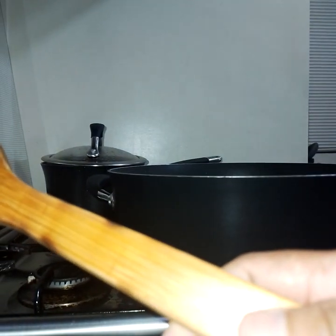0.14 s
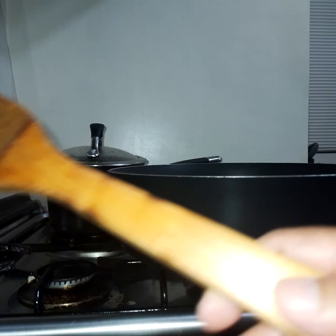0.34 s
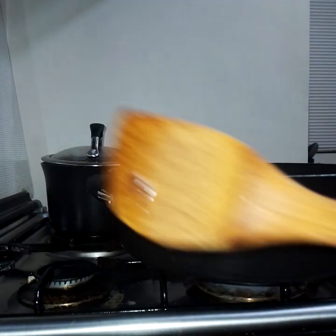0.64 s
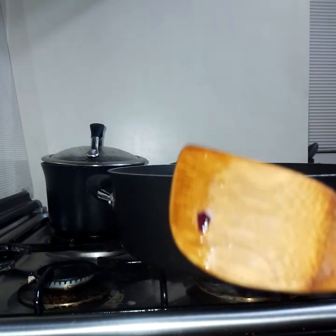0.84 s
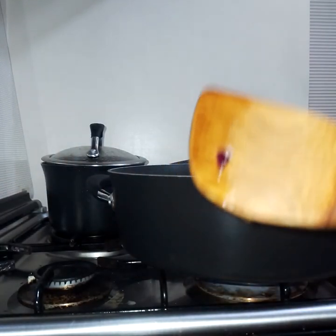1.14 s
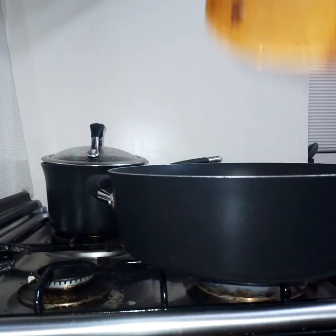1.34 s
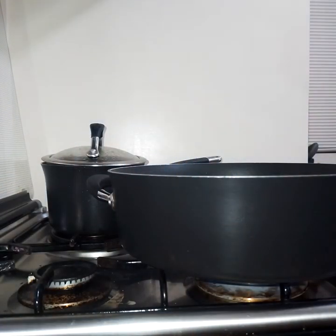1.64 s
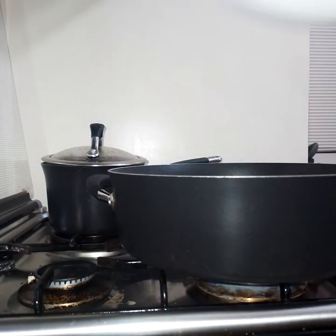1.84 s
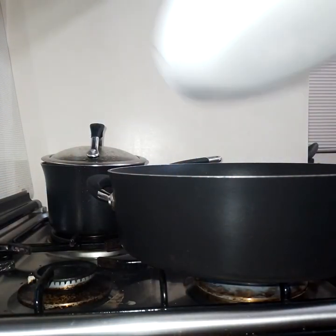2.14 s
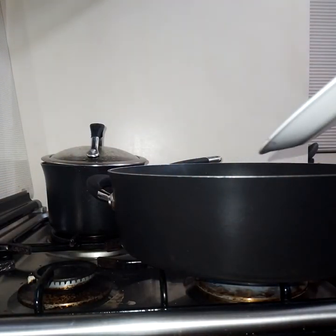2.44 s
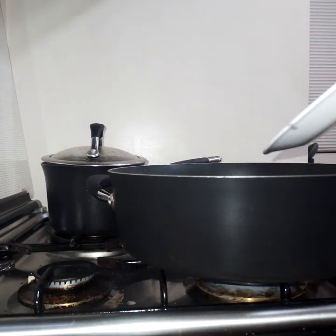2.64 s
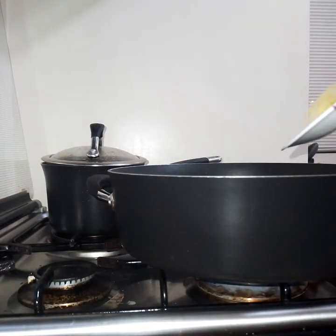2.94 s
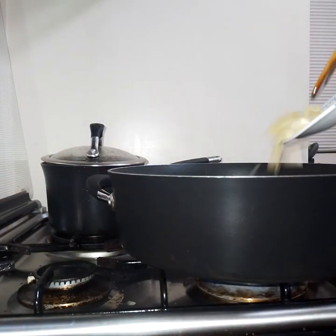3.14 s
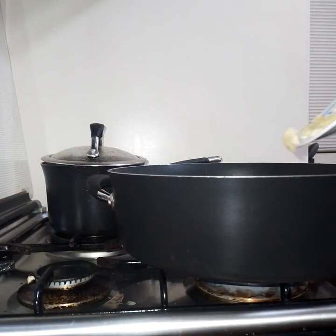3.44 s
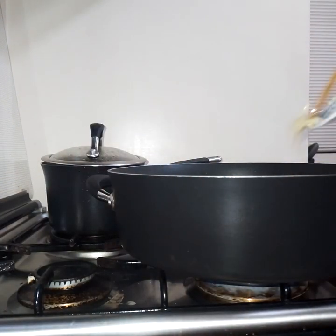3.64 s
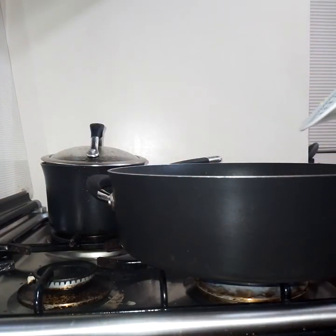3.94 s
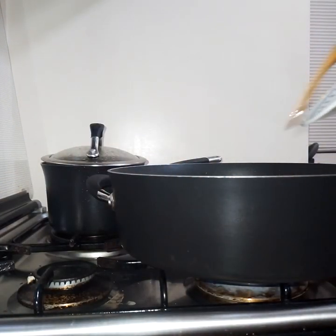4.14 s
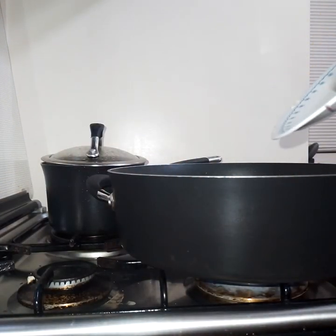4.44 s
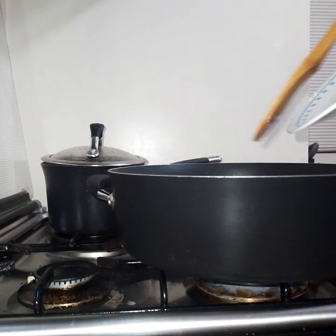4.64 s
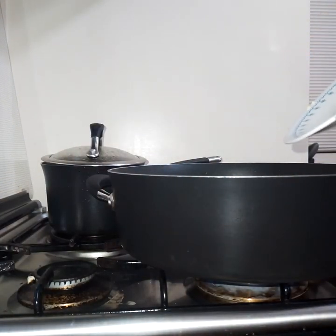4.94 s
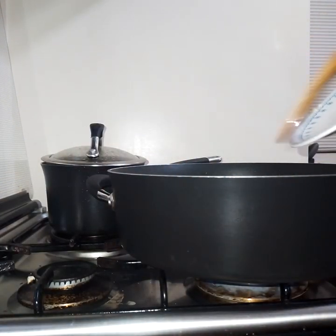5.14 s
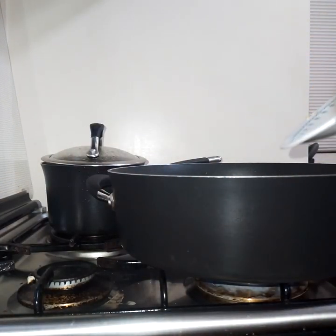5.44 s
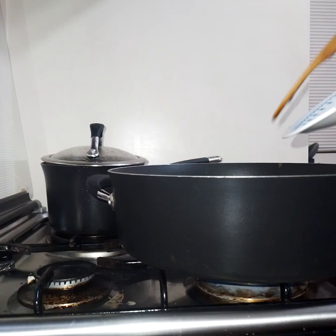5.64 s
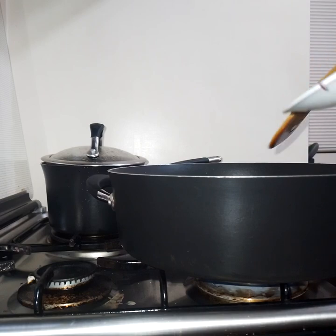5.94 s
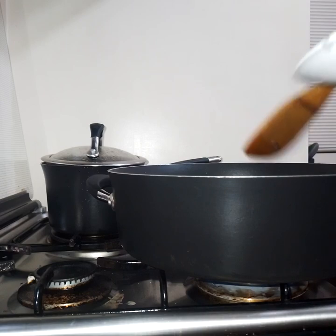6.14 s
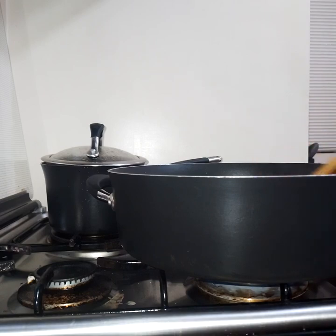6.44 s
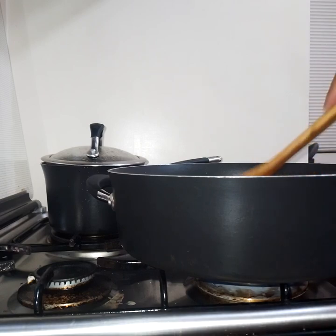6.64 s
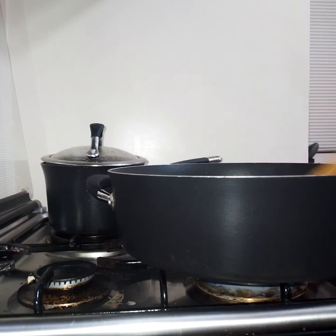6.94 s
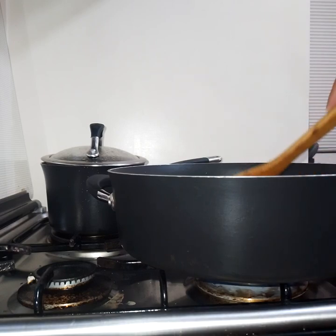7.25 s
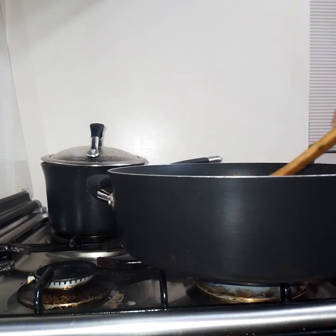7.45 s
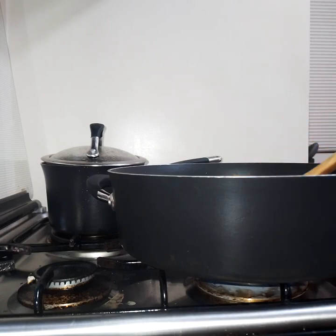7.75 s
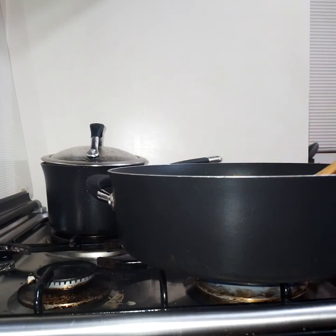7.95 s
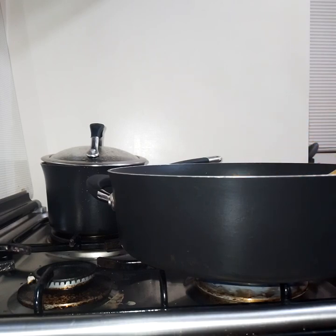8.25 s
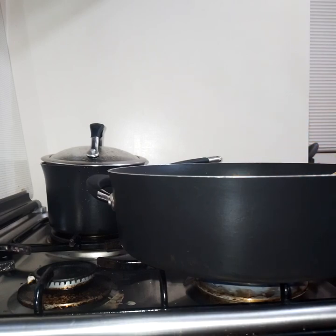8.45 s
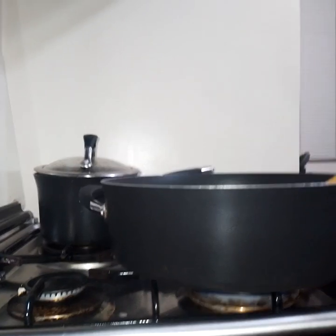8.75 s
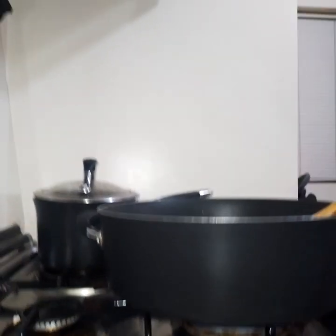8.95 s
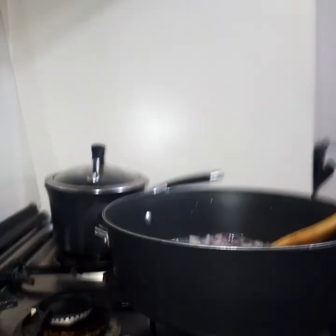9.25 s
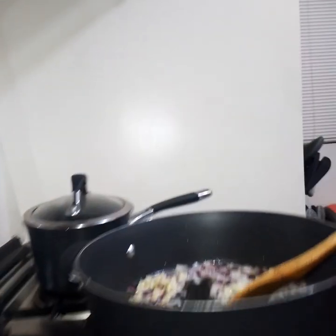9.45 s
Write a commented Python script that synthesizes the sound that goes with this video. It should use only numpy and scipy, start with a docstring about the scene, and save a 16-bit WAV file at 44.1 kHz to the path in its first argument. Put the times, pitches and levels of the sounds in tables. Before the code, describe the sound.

A bright, steady sizzle of onion and garlic in oil runs throughout, swelling gently around 1.9, 3.2 and 4.5 s, with small crackles and sharp spits scattered left and right, the strongest near 6.1 s. Beneath it a gas flame makes a quiet low roar and soft rush, stronger on the left. Faint plate taps come at 1.3 and 2.2 s. Around 3.1-3.2 s clumps of food land with dull thuds, another at 3.7. A wooden spatula clacks sharply on a hand-held plate at 3.9 and 4.4, then more lightly from 4.9 to 5.9, with brief groaning, squeaky scrapes after 4.4 and 5.8. At 6.85-7.1 it knocks the pan and judders in a rapid, fading, rising stutter. Only frying follows until about 9.1 s, when the flame's rush dims and a very loud double thump with a click strikes the left microphone. The small tiled kitchen adds a short reverberation.

```python
"""Onion and garlic sizzle and spit in oil over a gas flame in a small kitchen: shaped noise and puffs.
A wooden spatula taps and scrapes a plate (damped modes and noise) while clumps of onion drop in the pan.
Then it knocks and judders on the pan, ringing the metal's modes.
Near the end the camera is lifted, which screens the flame, and bumped right beside its left microphone port."""
import sys
import numpy as np
from scipy import signal
from scipy.fft import rfft, irfft, next_fast_len
from scipy.io import wavfile
from scipy.ndimage import map_coordinates

SR = 44100
rng = np.random.default_rng(int(sys.argv[2]) if len(sys.argv) > 2 else 0)


def int16_out(signal):
    """Quantize to a 16-bit WAV file."""
    q = np.round(np.clip(np.atleast_2d(signal).T, -1, 1) * 32767)
    wavfile.write(sys.argv[1], SR, q.astype(np.int16))


N = 422919
T = np.arange(SR * 3 // 4) / SR  # time axis of one short sound [s]

# modes of the plate left to ring: (frequency [Hz], level [dB], t60 [s])
PLATE_MODES = [(1160, -9, 0.18), (1238, -2.5, 0.22), (1301, -8, 0.28), (1560, -19, 0.061),
               (1969, -2.5, 0.18), (2180, -2.5, 0.22), (2285, -10, 0.078), (2700, -8.5, 0.086),
               (3570, -12.5, 0.11), (4230, -12.5, 0.14), (4910, -13, 0.09), (5660, -22, 0.027),
               (7150, -20, 0.3), (7570, -26, 0.15), (10400, -24, .2), (13400, -25, .15), (15300, -27, .12)]


def amp(db):
    """Decibels to gain."""
    return 10 ** (np.asarray(db) / 20)


def unit(x):
    """x at rms 1."""
    return x / np.sqrt(np.mean(x ** 2) + 1e-20)


def along(points, hz):
    """(Hz, value) points read on a log frequency axis."""
    f, v = np.transpose(points)
    return np.interp(np.log(hz + 1), np.log(f + 1), v)


def wobble(rate):
    """A smooth random curve, rate knots a second."""
    knots = rng.standard_normal(int(N * rate / SR) + 4)
    return map_coordinates(knots, [np.arange(N) * rate / SR])


def filtered(x, response):
    """x times a response of frequency."""
    n = x.shape[-1]
    padded = next_fast_len(n + SR // 2)
    spectrum = rfft(x, padded) * response(np.fft.rfftfreq(padded, 1 / SR))
    return irfft(spectrum, padded)[..., :n]


def coloured(x, spectrum):
    """x shaped by a spectrum, at rms 1."""
    return unit(filtered(x, lambda hz: amp(along(spectrum, hz))))


def resonance(hz, centre, width):
    """Causal response of one resonance, 1 at its centre."""
    return 1j * hz * width / (centre ** 2 - hz ** 2 + 1j * hz * width)


def panned(left_db):
    """Gains of the two channels for a left-right difference."""
    return amp([[left_db / 2], [-left_db / 2]])


def add(track, s, sound):
    """Mix a sound into the track at time s."""
    part = track[:, round(s * SR):][:, :sound.shape[-1]]
    part += sound[..., :part.shape[-1]]


def fade(t60):
    """Exponential decay that loses 60 dB in t60 seconds."""
    return np.exp(-np.log(1000) * T / t60)


def burst(t60):
    """Dying noise, unrelated in the two channels."""
    return rng.standard_normal((2, len(T))) * fade(t60)


def ring(modes):
    """Damped modes; the higher ones reach the two ports further out of step, up to 2 kHz."""
    out = np.zeros((2, len(T)))
    for hz, db, t60 in modes:
        start, skew = rng.uniform(-np.pi, np.pi, 2)
        phase = start + np.array([[0], [skew * min(hz / 2000, 1)]])
        out += amp(db) * fade(t60) * np.sin(2 * np.pi * hz * T + phase)
    return out


def in_kitchen(x, wet_db):
    """A close sound with its own diffuse tail from the tiled walls, made of decaying noise."""
    # reverberation of the room: (frequency [Hz], t60 [s])
    room_t60 = [(200, 0.58), (1000, 0.56), (3000, 0.57), (7000, 0.69), (15000, 0.48)]
    hz, t, bands = signal.stft(rng.standard_normal((2, len(T))), SR, nperseg=256)
    decay = np.exp(-np.log(1000) * t / along(room_t60, hz)[:, None])
    tail = signal.istft(bands * decay, SR, nperseg=256)[1]
    tail = tail / np.linalg.norm(tail[0])
    return x + amp(wet_db) * signal.fftconvolve(x, tail, axes=1)[:, :len(T)]


def lifted(start_s=9.05, length_s=0.15):
    """How far the camera has risen over the pan's rim, from 0 to 1."""
    return np.clip((np.arange(N) / SR - start_s) / length_s, 0, 1)


def sizzle(ticks_per_s=900, spread_db=2.0, tick_db=-8.0, rise_s=0.24, fall_s=0.29):
    """Countless tiny steam bursts merge into a flaring hiss; the larger ones stand out as ticks."""
    # moisture reaching the oil makes the frying flare up: (strongest time [s], gain [dB])
    flares = [(1.9, 2.5), (3.2, 1.3), (4.55, 3), (6.1, 0.7), (7.05, 0.7)]
    # spectrum of the frying: (frequency [Hz], density [dB per Hz])
    frying_spectrum = [(500, -35), (2000, 0), (3800, -2), (6000, -2.5), (9000, -0.5), (12500, -1.5),
                       (15500, 2)]
    steady_db, nearer_oil_db = -58, 0.7  # steady frying, and its gain once the camera is lifted

    t = np.arange(N) / SR
    hiss_db = steady_db + nearer_oil_db * lifted()
    for s, gain_db in flares:
        hiss_db += gain_db * np.exp(-((t - s) / np.where(t < s, rise_s, fall_s)) ** 2)
    hiss_db += 0.28 * wobble(4.5) + 0.71 * wobble(45)

    bursts = rng.random(N) < ticks_per_s / SR
    sizes = amp(spread_db * np.minimum(rng.exponential(size=N), 3))
    ticks = coloured(bursts * sizes * rng.standard_normal((2, N)), frying_spectrum)
    hiss = coloured(rng.standard_normal((2, N)), frying_spectrum)
    return amp(hiss_db) * (hiss + amp(tick_db) * ticks)


def spits(level_db=-1, wet_db=-8, scatter_db=3, sideways_db=6, scatter_octaves=0.46):
    """Water drops burst in the hot oil, each a short bright puff: a few large ones among many small."""
    # largest drops: (time [s], relative peak [dB], left-right difference [dB], resonance [Hz])
    large = [(.2035, -42, 16, 6900), (1.3897, -39.5, 12, 11400), (1.751, -38, -10, 9800),
             (1.906, -40.5, 11, 7200), (2.113, -38, 15, 11400), (3.1075, -41.5, 3, 9000),
             (4.0054, -39.5, 1, 10000), (4.5755, -41, -8, 10300), (5.1935, -43, -1, 10400),
             (6.08, -33.5, 9, 14900), (7.21, -42.5, -7.5, 11000), (8.649, -41, 4, 7500)]
    # smaller drops burst all over the pan, one at a random moment of each time slot
    small_per_s, small_db, small_hz = 2.8, -47.5, 9000
    puff_t60_s = 0.029

    drops = list(large)
    for k, (when, loud, side, high) in enumerate(rng.uniform(-0.83, 1, size=(32, 4))):
        s = (k + .5 + when / 2) / small_per_s
        hz = small_hz * 2 ** (scatter_octaves * high)
        drops.append((s, small_db + scatter_db * loud, sideways_db * side, hz))

    out = np.zeros((2, N))
    for s, db, left_db, hz in drops:
        bright = lambda f: resonance(f, hz, 7800) * f ** 2 / (f ** 2 + 5500 ** 2)
        puff = filtered(burst(puff_t60_s), bright)
        add(out, s, amp(db + level_db) * panned(left_db) * in_kitchen(puff, wet_db))
    return out


def plate_taps(level_db=-11.0, crack_db=3, wet_db=-1, favoured_db=5, favoured_width_hz=140):
    """Wood taps the hand-held plate; the spot favours one mode, harder contact wakes the upper ones."""
    # (time [s], relative peak [dB], lowest modes [relative dB], brightness [relative dB], strongest mode [Hz])
    taps = [(1.2847, -42.5, -7, -15, 2230), (2.2189, -39.5, -10.5, -2, 1240),
            (3.3027, -30, -15.5, -30, 2200), (3.89, -23.5, -25, -15, 1970), (3.9214, -35.5, -30, -9, 1970),
            (4.3939, -23, -17, -19, 2770), (4.929, -36, -8.5, -20, 1950), (5.3333, -33, -17, -35, 2220),
            (5.7229, -31.5, -12.5, -38, 1970), (5.8057, -34, -16, -17, 1200),
            (5.8749, -30.5, -13.5, -16, 2160)]
    # wood meeting the plate: (frequency [Hz], level [dB])
    crack_spectrum = [(400, -11), (1250, 1), (1550, 4), (2100, 9.5), (2900, 1.5), (3700, -1), (5500, 0.5),
                      (7000, -3), (10000, -14), (15000, -18)]
    hand_damping = 0.45  # share of the plate's ring time that the hand leaves

    out = np.zeros((2, N))
    for s, db, low_db, bright_db, strongest_hz in taps:
        colour = [(1300, low_db + 10.5), (1950, 0), (2400, 0), (5000, bright_db + 12)]
        modes = []
        for hz, mode_db, t60 in PLATE_MODES:
            favour = favoured_db * np.exp(-((hz - strongest_hz) / favoured_width_hz) ** 2)
            modes.append((hz, mode_db + along(colour, hz) + favour, t60 * hand_damping))
        crack = filtered(burst(0.059), lambda f: amp(along(colour, f) + along(crack_spectrum, f)))
        onset = 1 - fade(0.0048)
        tap = (ring(modes) + amp(crack_db) * crack) * onset
        add(out, s, amp(db + level_db) * panned(left_db=7.5) * in_kitchen(tap, wet_db))
    return out


def plate_scrapes(width_hz=55, grain_db=2.0, focus_db=50, squeak_lag_s=.05):
    """Sliding wood catches and slips: the lowest modes groan, then those around one high pitch squeak."""
    # (start [s], strongest [s], end [s], groan [relative dB], squeak [relative dB],
    #  squeak pitch [Hz], squeak left-right difference [dB])
    slides = [(4.33, 4.46, 4.9, -57.5, -59, 12300, -4), (5.721, 5.823, 6.13, -53.5, -60, 7300, 5)]

    def sing(modes):
        """Noise through the plate's resonances, at rms 1."""
        response = lambda f: sum(amp(db) * resonance(f, hz, width_hz * np.sqrt(hz / 2000)) for hz, db in modes)
        return unit(filtered(rng.standard_normal((2, len(T))), response))

    out = np.zeros((2, N))
    for start, strongest, end, groan_db, squeak_db, squeak_hz, left_db in slides:
        grain = amp(grain_db * wobble(70)[:len(T)])
        pressure = np.interp(start + T, [start, strongest, end], [0, 1, 0]) ** 2.3 * grain
        groan = sing([(hz, db) for hz, db, _ in PLATE_MODES if hz < 1400])
        squeak = sing([(hz, db - focus_db * np.log2(hz / squeak_hz) ** 2) for hz, db, _ in PLATE_MODES])
        add(out, start, amp(groan_db) * panned(left_db=9) * pressure * groan)
        add(out, start + squeak_lag_s, amp(squeak_db) * panned(left_db) * pressure * squeak)
    return out


def judder(count=6, start_s=6.923, gap_s=.029, contact_s=0.014):
    """Pushed across the pan, the spatula slips evenly, then weaker and higher as the hand eases off."""
    first_db, first_hz = -27, 620
    push_hold_s, ease_db_per_s, lighter_hz_per_db = 0.045, 170, 25  # a lighter touch sounds higher
    since = gap_s * np.arange(count)
    eased_db = ease_db_per_s * np.maximum(since - push_hold_s, 0)
    return [(start_s + s, first_db - db, first_hz + lighter_hz_per_db * db, contact_s)
            for s, db in zip(since, eased_db)]


def pan_blows(level_db=-6.0, rub_db=7.0, damping=0.77):
    """Soft food and the wooden spatula ring the pan's modes near the centre of each blow."""
    # clumps of onion landing: (time [s], relative level [dB])
    clumps = [(3.099, -48.5), (3.167, -42.5), (3.212, -31.5), (3.714, -43)]
    # spatula knocks: (time [s], relative level [dB], centre of the blow [Hz], contact length [s])
    knocks = [(6.847, -33, 1650, .0012), (6.898, -25.5, 990, .0059)]
    # modes of the pan before damping: (frequency [Hz], level [dB], t60 [s])
    pan_modes = [(542, -0.5, 0.21), (600, 2, 0.14), (873, -13, 0.068), (1104, -7, 0.11), (1238, 3.5, 0.073),
                 (1460, -13, .08), (1670, -22, 0.073), (1904, -4, 0.077), (2210, -21, .07),
                 (3480, -7, 0.069)]
    clump_hz, clump_contact_s = 517, 0.039  # centre and length of their soft blow
    rub_spectrum = [(300, -13), (540, 11), (780, -3.5), (1150, 4.5), (2000, 1.5), (3000, -7)]  # (Hz, dB)

    out = np.zeros((2, N))
    food = [(s, db, clump_hz, clump_contact_s) for s, db in clumps]
    for s, db, centre_hz, contact_s in food + list(knocks) + judder():
        focus = lambda hz: -7 * np.log2((hz + 1) / centre_hz) ** 2
        modes = [(hz, mode_db + max(focus(hz), -22), t60 * damping) for hz, mode_db, t60 in pan_modes]
        rub = filtered(burst(0.11), lambda f: amp(focus(f) + along(rub_spectrum, f)))
        onset = 1 - np.exp(-3 * T / contact_s)
        blow = (ring(modes) + amp(rub_db) * rub) * onset
        left_db = along([(550, 4.3), (1300, 12.0)], centre_hz)
        add(out, s, amp(db + level_db) * panned(left_db) * in_kitchen(blow, wet_db=-5.5))
    return out


def camera_bumps(push_s=0.00052):
    """Contacts and rebounds push air in the left port, click and ring the case; the room answers faintly."""
    # (time [s], push [dB], click [relative dB], time to its rebound [s])
    bumps = [(9.0832, -6, -14, .0024), (9.0918, 2, 0, .0016)]
    # modes of the camera's case: (frequency [Hz], relative level [dB], t60 [s])
    case_modes = [(87, 6, 0.047), (282, 11.5, 0.036), (383, 4, 0.061), (855, 7.5, 0.041), (905, -3.5, 0.14),
                  (1600, 4, 0.054), (2060, 6, 0.018), (2976, -7.5, 0.097), (6660, -4, 0.041)]
    # click of the contact: (frequency [Hz], level [dB])
    click_spectrum = [(200, -14), (700, 3), (1500, 3.5), (3800, 5), (5200, 1.5), (7100, -8), (9000, -8),
                      (11000, -4.5), (15000, -9)]
    # the bump as the room returns it: (frequency [Hz], level [dB])
    echo_spectrum = [(100, -8), (300, 2.5), (800, 0.5), (1300, -7), (5500, -5.5), (7200, 2.5), (15000, -1)]
    rebound_push_db, rebound_click_db = -5.5, 1  # the rebound is lighter and sharper

    contacts = []
    for s, push_db, click_db, gap_s in bumps:
        contacts.append((s, push_db, click_db))
        contacts.append((s + gap_s, push_db + rebound_push_db, click_db + rebound_click_db))

    out = np.zeros((2, N))
    for s, push_db, click_db in contacts:
        air = (1 - T / push_s) * np.exp(-T / push_s)
        push = amp(push_db) * (air + amp(-28.0) * ring(case_modes))
        noise = burst(.007) + 0.072 * burst(0.026)
        click = amp(click_db - 2.5) * filtered(noise, lambda f: amp(along(click_spectrum, f)))
        direct = push + click
        tail = in_kitchen(direct, wet_db=2.5) - direct
        echo = filtered(tail, lambda f: amp(along(echo_spectrum, f)))
        add(out, s, direct * amp([[0], [-31]]) + echo * amp([[-23.5], [-31]]))
    return out


def gas_flame():
    """The flame: a low roar nearly alike at both ports and a rush that is stronger on the left."""
    # low roar: (frequency [Hz], density [dB per Hz])
    roar_spectrum = [(25, -3), (70, -16.5), (115, -6), (165, -14.5), (215, -3.5), (310, 1.5), (420, -5.5),
                     (600, -6), (1000, -28), (3000, -44)]
    # rush of the gas: (frequency [Hz], density [dB per Hz])
    rush_spectrum = [(200, -48), (450, -7), (620, -1.5), (820, -4), (1070, 1), (1350, -3.5), (1850, 3),
                     (2300, -9.5), (3500, -15.5), (8000, -25)]
    roar_db, rush_db, screened_db = -64.5, -61.5, -7  # the lifted camera is screened from the rush

    shared_noise = rng.standard_normal(N) + 0.14 * rng.standard_normal((2, N))
    roar = coloured(shared_noise, roar_spectrum) * panned(left_db=2.5)
    rush = coloured(rng.standard_normal((2, N)), rush_spectrum) * panned(left_db=8.5)
    roar_gain = amp(roar_db + 0.78 * wobble(8.3))
    rush_gain = amp(rush_db + screened_db * lifted() + 0.21 * wobble(4.8))
    return roar_gain * roar + rush_gain * rush


def scene():
    """Everything around the stove, and the bumps at the camera."""
    frying = sizzle() + spits()
    spatula_and_food = plate_taps() + plate_scrapes() + pan_blows()
    return frying + spatula_and_food + camera_bumps() + gas_flame()


def record(dry, notch_hz=162, notch_width_hz=85, low_cut_hz=40, top_hz=15850):
    """Each port adds a treble resonance, loud peaks saturate, bass is notched and thinned, the top cut."""
    # microphone ports, left then right: (resonance [Hz], width [Hz], gain [dB])
    port_resonances = [(7010, 840, 15), (9900, 1170, 14)]

    def ports(f):
        return np.array([1 + (amp(db) - 1) * resonance(f, hz, width) for hz, width, db in port_resonances])

    def bass_and_top(f):
        notch = 1 - resonance(f, notch_hz, notch_width_hz)
        low_cut = (1j * f / (1j * f + low_cut_hz)) ** 2
        return notch * low_cut * (f < top_hz)

    heard = filtered(dry, ports)
    limited = heard / (1 + (heard / .6) ** 4) ** .25  # levels off towards 0.6
    return filtered(limited, bass_and_top)


dry = scene()
out = record(dry)
int16_out(out)
```